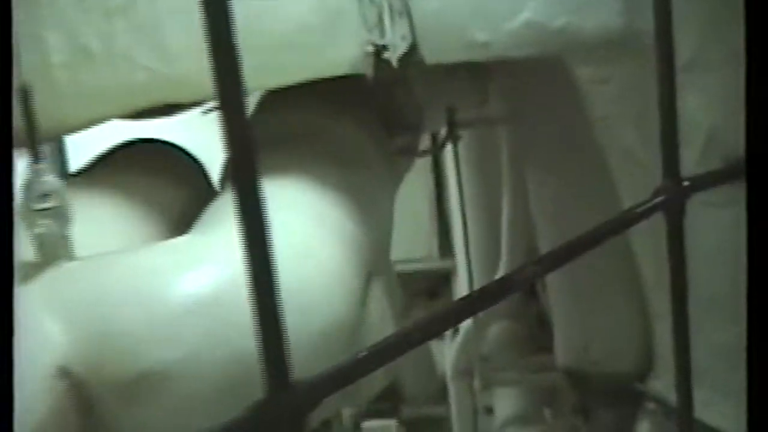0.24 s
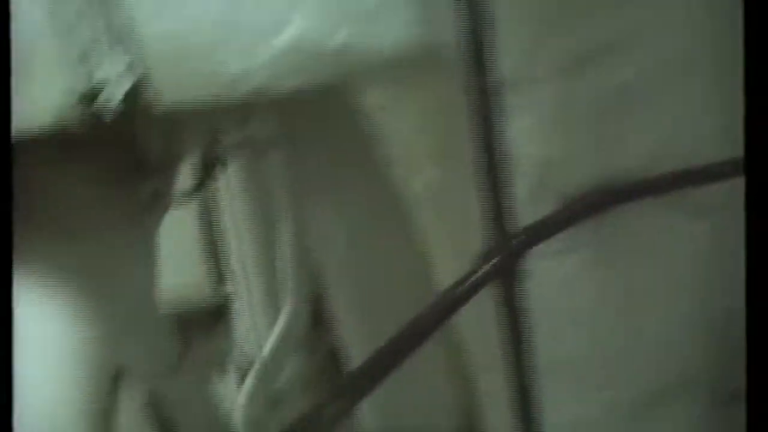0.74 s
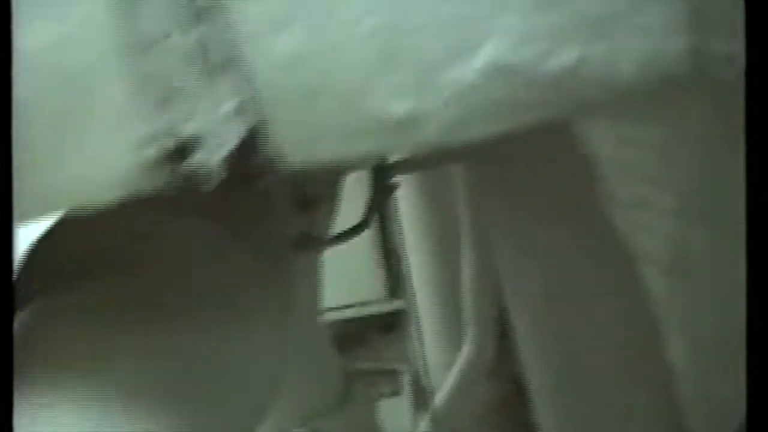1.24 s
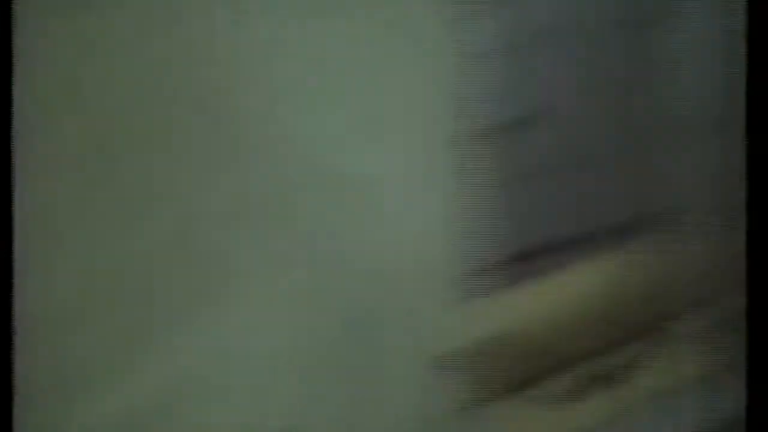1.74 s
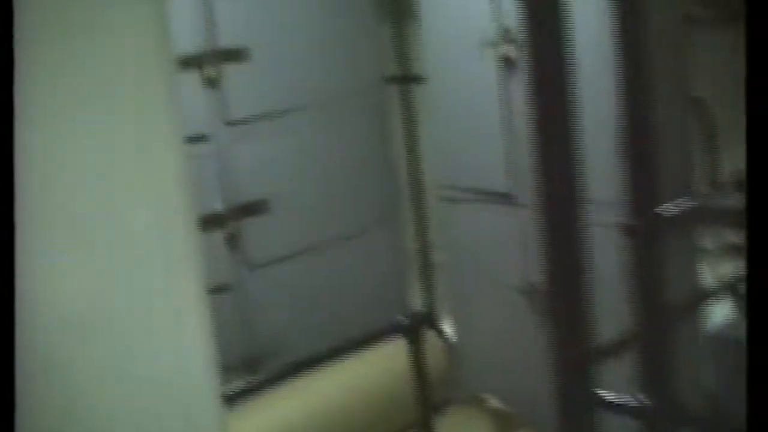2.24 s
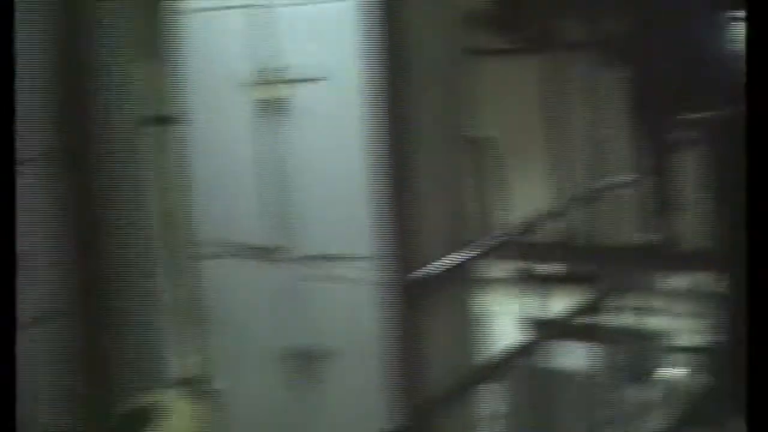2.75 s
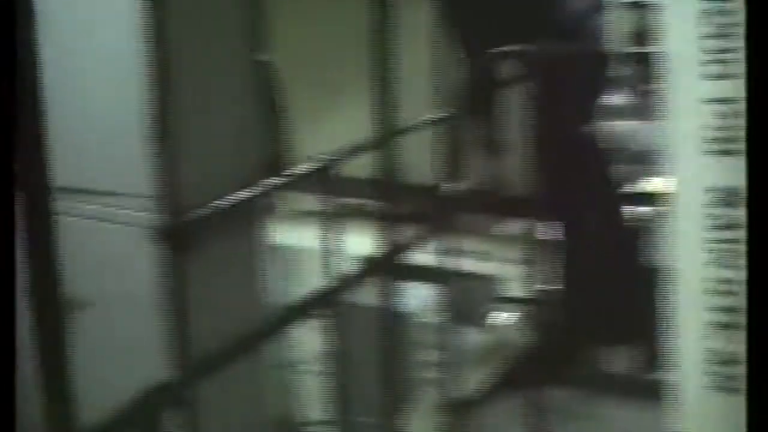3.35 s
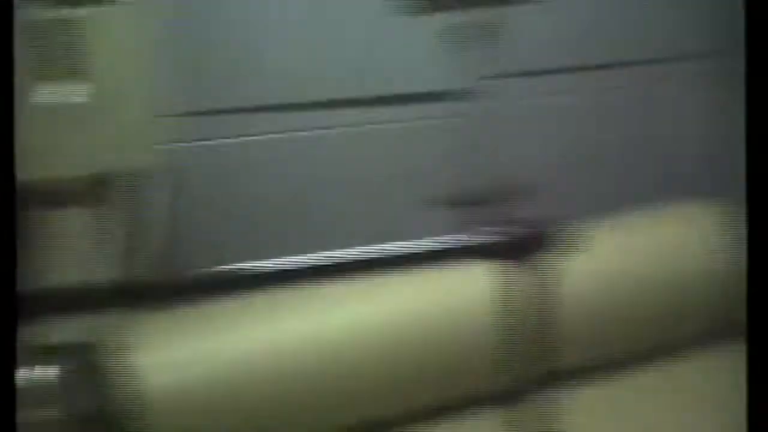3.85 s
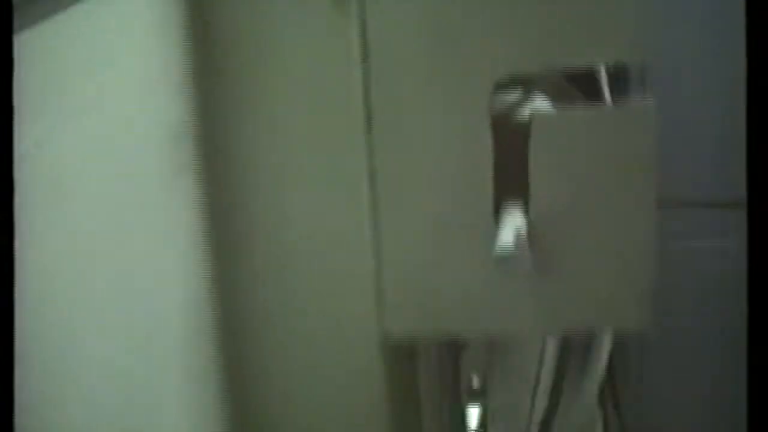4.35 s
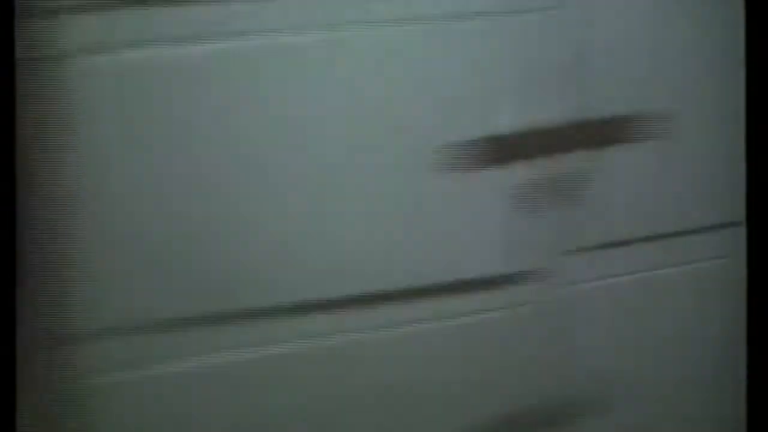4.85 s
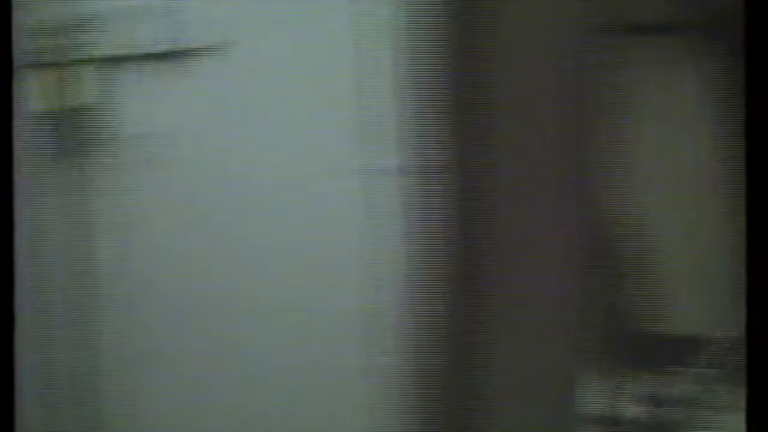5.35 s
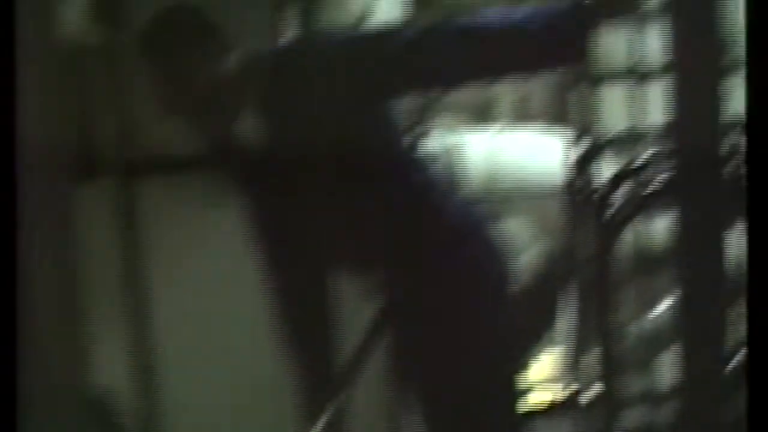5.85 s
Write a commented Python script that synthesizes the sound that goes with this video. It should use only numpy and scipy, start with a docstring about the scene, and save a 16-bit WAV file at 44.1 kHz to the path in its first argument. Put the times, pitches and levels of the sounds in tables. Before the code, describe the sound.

About six seconds of unbroken loud noise in a ship's steel machinery room. From the first instant, steam hisses brightly, blowers roar through resonant ducts and the deck rumbles low. A valve whistles near 3 kHz, raspy and wavering, swelling several times a second, with quick shrieks an octave higher and a thinner, fluttering side whistle. Roar is fullest at the start. Dull low bumps come around 0.7-0.8 s and 1.8 s, with fainter ones near 2.4, 3.0 and 3.8-3.9. The roar dips around 2 s; hissy resonances flare at 2.6-3.0, then roar and rumble thin markedly near 3.2. The whine ducks near 3.4; hiss and roar return by 3.9. A hollow mid flare comes at 4.7, a lower one at 5.3, and the whine drops briefly near 5.5 before a longer swell. It ends still running. Short dense echoes, compressed handheld camera sound, faint hum and line whistle, left-sided.

```python
"""A steam valve sings a wavering high whine with an octave shriek in a ship's steel machinery space.
Filtered noise makes the steam hiss, blower roar, deck rumble and brief resonant flares; sines make the tones.
Dense echoes make the tones beat, and soft noise pushes ring a few low modes as dull bumps.
A swinging hand-held tape camera shifts the balance, rides the gain and adds hum and line whistle;
the sound is on the left channel, with faint crosstalk on the right."""
import sys
import numpy as np
from scipy import signal
from scipy.fft import rfft, irfft
from scipy.io import wavfile
from scipy.ndimage import uniform_filter1d

SR = 44100
rng = np.random.default_rng(int(sys.argv[2]) if len(sys.argv) > 2 else 0)


def unload_wav(signal):
    """Save mono or channel-first audio to the path in sys.argv[1] as 16-bit WAV at rate SR, clipped to [-1, 1]."""
    wavfile.write(
        sys.argv[1],
        SR,
        np.round(np.clip(np.atleast_2d(signal).T, -1, 1) * 32767).astype(np.int16),
    )


N = 268425
T = np.arange(N) / SR
HZ = np.maximum(np.arange(N // 2 + 1) * SR / N, 1)
ROOM_T60_S = 0.32


def undb(db):
    """Decibels to gain."""
    return 10 ** (np.asarray(db) / 20)


def unit(x):
    """Scale to rms 1."""
    return x / np.sqrt(np.mean(x ** 2))


def curves(table):
    """Level columns of a time table, interpolated per sample."""
    time_s, *columns = np.transpose(table)
    return [np.interp(T, time_s, column) for column in columns]


def walk(corner_hz):
    """Low-passed random curve of rms 1."""
    spectrum = rfft(rng.standard_normal(N))
    return unit(irfft(spectrum / (1 + (HZ / corner_hz) ** 4), N))


def bell(center_s, reach_s):
    """Gaussian in time, 1 at the centre, exp(-2) at reach_s either side."""
    return np.exp(-2 * ((T - center_s) / reach_s) ** 2)


def resonance(hz, width_hz):
    """Complex response of one mode, gain 1 at its centre."""
    return 1 / (1 + 1j * (HZ / hz - hz / HZ) * hz / width_hz)


def patchy(x, depth_db, rate_hz=2.3, size=1024):
    """Narrow bands swell and fade separately as the microphone moves through room interference."""
    _, frame_s, bands = signal.stft(x, SR, nperseg=size)
    field = uniform_filter1d(rng.standard_normal(bands.shape), size=4, axis=0)
    rates_hz = np.arange(len(frame_s) // 2 + 1) / frame_s[-1]
    field = unit(irfft(rfft(field) / (1 + (rates_hz / rate_hz) ** 2), len(frame_s)))
    return signal.istft(bands * undb(depth_db * field), SR, nperseg=size)[1][:N]


def turbulence(spectrum, modes=(), patchy_db=1.2):
    """Flow noise with a broad colour, lifted in power where duct or pipe resonates."""
    hz, db = np.transpose(spectrum)
    colour = undb(np.interp(np.log(HZ), np.log(hz), db))
    lift = 1 + sum(np.abs(undb(mode_db) * resonance(mode_hz, width_hz)) ** 2
                   for mode_hz, width_hz, mode_db in modes)
    noise = irfft(rfft(rng.standard_normal(N)) * colour * np.sqrt(lift), N)
    return unit(patchy(noise, patchy_db))


def room(x):
    """Dense, exponentially decaying reflections from steel walls."""
    t = T[T < ROOM_T60_S]
    echoes = rng.standard_normal(len(t)) * np.exp(-np.log(1000) * t / ROOM_T60_S)
    return unit(irfft(rfft(x) * rfft(echoes, N), N))


def partial(phase, echo_db, steadiness):
    """Tone beating against its echoes; steadiness 1 levels the slow swell, keeps quick beats."""
    direct = np.sin(phase)
    tone = direct + undb(echo_db) * room(direct)
    swell_power = uniform_filter1d(tone ** 2, size=3000)
    return unit(tone / swell_power ** (steadiness / 2))


def swelling(events, rest_db, attack_s, release_s):
    """Level [dB] that rises from rest, holds and falls back at each event."""
    gain = rest = undb(rest_db)
    for start_s, length_s, db in events:
        rise = (T - start_s) / attack_s
        fall = (start_s + length_s - T) / release_s
        ramp = np.clip(np.minimum(rise, fall) + .5, 0, 1)
        gain = gain + (undb(db) - rest) * np.sin(np.pi / 2 * ramp) ** 2
    return 20 * np.log10(np.maximum(gain, rest / 2))


# whine swells: (start [s], length [s], level before trim [dB])
WHINE_SWELLS = [(.13, .2, -31), (.52, 0.098, -25), (1.0, .13, -25), (1.425, 0.089, -23),
                (1.643, 0.1474, -24.5), (1.83, 0.099, -23), (2.15, 0.067, -27), (2.5, 0.138, -25),
                (2.74, 0.055, -28.5), (2.86, 0.113, -23.5), (3.0, 0.117, -25), (3.14, 0.1624, -22),
                (3.635, 0.055, -26.5), (3.77, 0.064, -28), (3.94, 0.068, -26), (4.07, 0.0887, -25),
                (4.36, .1, -26), (4.47, 0.145, -21.5), (4.695, .04, -28), (4.775, 0.043, -25),
                (4.84, 0.0844, -23.5), (5.01, 0.051, -26.5), (5.14, 0.039, -26), (5.23, 0.18, -25),
                (5.68, 0.34, -24.5)]
# octave shrieks: (start [s], length [s], level before trim [dB])
OCTAVE_SHRIEKS = [(0.205, 0.045, -20), (0.363, 0.078, -23), (0.653, 0.03, -21.5), (0.818, 0.097, -20.5),
                  (0.93, 0.028, -23), (1.058, 0.041, -18), (1.179, 0.043, -18.5), (1.317, 0.044, -20.5),
                  (1.437, 0.064, -22.5), (1.788, 0.052, -22.5), (1.907, 0.13, -19.5), (2.194, 0.064, -20),
                  (2.288, 0.04, -24.5), (2.37, 0.066, -21.5), (2.464, 0.076, -22), (2.685, 0.06, -22),
                  (2.895, 0.073, -23.5), (3.065, 0.034, -23), (3.125, 0.16, -21), (3.325, 0.046, -22.5),
                  (3.494, 0.033, -20.5), (4.009, 0.04, -23), (4.105, 0.065, -19), (4.288, 0.019, -21.5),
                  (4.703, 0.03, -23), (4.975, 0.037, -21.5), (5.127, 0.025, -21.5)]
# whine dropouts: (deepest time [s], reach either side [s])
WHINE_DROPOUTS = [(0.066, 0.079), (0.795, .05), (1.164, 0.036), (2.072, 0.039), (2.274, .04), (3.387, .12),
                  (3.885, .06), (4.04, 0.028), (4.264, 0.059), (4.675, 0.019), (4.753, .015),
                  (4.827, 0.014), (5.468, 0.1125)]
WHINE_HZ, SAG_HZ_PER_S, FLATTEN_HZ_PER_DB = 3039, 2.4, 1.0
WHINE_ATTACK_S, WHINE_RELEASE_S = 0.051, 0.054
OCTAVE_ATTACK_S, OCTAVE_RELEASE_S = 0.02, 0.031
# resting levels before trim
WHINE_DB, OCTAVE_DB, OCTAVE_FADE_DB_PER_S = -31.5, -28, 0.28
DROPOUT_DB = -9


def valve(first_trim_db=0.83, octave_trim_db=1.0, third_db=-47):
    """Steam past a valve edge whistles; flow flutters pitch and level, the whine flattens as it swells."""
    whine_rest_db = WHINE_DB + 2 * walk(12)
    octave_rest_db = OCTAVE_DB - OCTAVE_FADE_DB_PER_S * T + 3.0 * walk(30)
    whine_db = swelling(WHINE_SWELLS, whine_rest_db, WHINE_ATTACK_S, WHINE_RELEASE_S)
    whine_db = whine_db + DROPOUT_DB * sum(bell(s, reach_s) for s, reach_s in WHINE_DROPOUTS)
    octave_db = swelling(OCTAVE_SHRIEKS, octave_rest_db, OCTAVE_ATTACK_S, OCTAVE_RELEASE_S)

    flatten_hz = FLATTEN_HZ_PER_DB * (whine_db - WHINE_DB)
    hz = WHINE_HZ - SAG_HZ_PER_S * T - flatten_hz + 15 * walk(16)
    rasp = walk(250)
    low_phase = 2 * np.pi * np.cumsum(hz + 16 * rasp) / SR
    high_hz = 2 * hz - 22 + 20 * walk(35) + 22 * rasp
    high_phase = 2 * np.pi * np.cumsum(high_hz) / SR

    first_gain = undb(whine_db + first_trim_db + .6 * walk(14))
    octave_gain = undb(octave_db + octave_trim_db + .5 * walk(40))
    third_gain = undb(third_db + 2.5 * walk(5.7))
    first = first_gain * partial(low_phase, echo_db=-12, steadiness=1)
    octave = octave_gain * partial(high_phase, echo_db=-12, steadiness=1)
    third = third_gain * partial(3 * low_phase, echo_db=12, steadiness=.3)
    return first + octave + third


def side_whistle(pipe_db, hz=4395, waver_hz=40, below_db=-14, fade_db=4.0):
    """A pipe mode on the edge of whistling wavers in pitch and level."""
    phase = 2 * np.pi * np.cumsum(hz + waver_hz * walk(30.7)) / SR
    gain = undb(pipe_db + below_db + fade_db * walk(9.5))
    return gain * partial(phase, echo_db=-8, steadiness=0.46)


# pipe noise colour: (frequency [Hz], relative density [dB per Hz])
PIPE_SPECTRUM = [(2500, -23), (3600, -12), (4100, -8.5), (4500, 0), (4720, -8.5), (5050, -9), (5250, 0),
                 (5750, 0), (5950, 4), (6350, -5), (6620, -10.5), (8000, -36)]
# pipe cross modes: (frequency [Hz], width [Hz], level over broad noise [dB])
PIPE_CROSS_MODES = [(3903, 40, 6.5), (4170, 51, 7.5), (4370, 90, 1.5), (4800, 40, 7), (5152, 50, 2),
                    (5000, 60, 1), (5620, 73, 2), (6900, 156, 10)]
# throttle hiss colour: (frequency [Hz], relative density [dB per Hz])
JET_SPECTRUM = [(5000, -15), (6900, -4.5), (7800, -0.5), (8450, 1), (8800, -1), (9250, 5.5), (10000, 0.5),
                (11000, -2.5), (11700, -14), (12700, -18.5), (14300, -56), (15500, -42)]


def steam(pipe_db, jet_db, pipe_trim_db=1.12, jet_trim_db=0.66, flicker_db=0.8):
    """Steam rings the pipe's cross modes and hisses at the throttle; both flicker with the flow."""
    pipe_gain = undb(pipe_db + pipe_trim_db + flicker_db * walk(11))
    jet_gain = undb(jet_db + jet_trim_db + flicker_db * walk(14.4))
    pipe = turbulence(PIPE_SPECTRUM, PIPE_CROSS_MODES, patchy_db=2.46) * pipe_gain
    jet = turbulence(JET_SPECTRUM, patchy_db=1.84) * jet_gain
    return pipe + jet


# duct noise colour: (frequency [Hz], relative density [dB per Hz])
ROAR_SPECTRUM = [(100, -45), (280, -15.5), (370, -8), (620, -6), (880, 0.5), (1200, -3), (1450, -2),
                 (1620, -6), (2000, -5), (2450, -7.5), (3200, -4.5), (5000, -12), (8000, -52.5)]
# duct resonances: (frequency [Hz], width [Hz], level over broad noise [dB])
DUCT_RESONANCES = [(340.6, 35, 6), (429, 23, 1.5), (534, 45, 5), (682, 13, 2.5), (2740, 60, -8)]
# rotor tones: (mean frequency [Hz], mean level [dB])
ROTOR_TONES = [(175, -58), (350, -55), (699.5, -53)]


def blowers(roar_db, trim_db=2.0, surge_db=0.33, drift=0.0032):
    """Air roars in resonant ducts; rotor tones drift together in pitch and fade separately."""
    roar_gain = undb(roar_db + trim_db + surge_db * walk(15.0))
    sound = turbulence(ROAR_SPECTRUM, DUCT_RESONANCES) * roar_gain
    phase_per_hz = 2 * np.pi * np.cumsum(1 + drift * walk(3.6)) / SR
    for hz, db in ROTOR_TONES:
        sound = sound + undb(db + 1.7 * walk(0.41)) * unit(np.sin(hz * phase_per_hz))
    return sound


# plating noise colour: (frequency [Hz], relative density [dB per Hz])
DECK_SPECTRUM = [(20, -23), (50, -22), (75, -11), (100, -10), (140, 0), (185, 2.5), (215, -1), (245, 4.5),
                 (300, 0), (600, -25.5)]
# deck rumble before trim: (time [s], level [dB])
DECK_LEVELS = [(0.0, -48.5), (0.96, -46), (3.12, -55.5), (3.19, -58), (3.44, -53.5), (6.05, -52),
               (6.09, -51)]


def deck(trim_db=3):
    """Plating rumbles under the machines as low filtered noise."""
    return turbulence(DECK_SPECTRUM) * undb(curves(DECK_LEVELS)[0] + trim_db)


# brief resonances: (top time [s], reach either side [s], frequency [Hz],
# width before squaring the response [Hz], level [dB])
RESONANT_FLARES = [(0.059, 0.24, 172, 25, -41), (0.08, 0.18, 4360, 50, -27), (1.4, 0.079, 3230, 60, -35),
                   (2.606, 0.21, 5350, 260, -27.5), (2.851, 0.2, 5570, 320, -24.5),
                   (2.86, .05, 4815, 40, -33), (3.037, 0.079, 4360, 30.1, -31),
                   (3.038, 0.074, 9080, 120, -33), (4.66, 0.082, 1090, 160, -30),
                   (5.34, 0.16, 820, 70, -33.5)]


def flares():
    """Flow briefly drives one resonance harder, so narrow-band noise sings out."""
    out = np.zeros(N)
    for top_s, reach_s, hz, width_hz, db in RESONANT_FLARES:
        ring = unit(irfft(rfft(rng.standard_normal(N)) * resonance(hz, width_hz) ** 2, N))
        out += undb(db) * ring * bell(top_s, reach_s)
    return out


# dull bumps: (push-envelope peak time [s], peak level [dB])
BUMP_EVENTS = [(0.733, -28), (0.824, -34.5), (1.755, -32.5), (1.839, -33), (2.449, -38), (2.987, -37),
               (3.082, -38), (3.779, -41), (3.914, -41)]
# modes a bump rings: (frequency [Hz], width [Hz], relative level before body response [dB])
BUMP_RING_MODES = [(117, 16, -12), (132, 23, 12), (148, 20, 3), (178, 22, -5)]


def bumps(contact_s=0.01275):
    """Soft, scuffing noise pushes ring a few low modes."""
    t, out = T[:SR // 2], np.zeros(N)
    modes = sum(undb(db) * resonance(hz, width_hz) for hz, width_hz, db in BUMP_RING_MODES)
    body = resonance(143, 90)
    ring = irfft(modes * body, N)[:len(t)]
    for peak_s, db in BUMP_EVENTS:
        push = rng.standard_normal(len(t)) * t * np.exp(-t / contact_s)
        thud = signal.fftconvolve(push, ring)[:len(t)]
        thud = thud / np.abs(thud).max() * undb(db)
        start = int((peak_s - contact_s) * SR)
        out[start:start + len(t)] += thud[:N - start]
    return out


# balance as the microphone turns, before source trims:
# (time [s], blower roar level [dB], pipe steam level [dB], jet hiss level [dB])
FACING_LEVELS = [(0.0, -26, -24.5, -30.5), (0.34, -28.5, -24.5, -31.5), (1.37, -30.5, -26.5, -31.5),
                 (1.49, -32, -25.5, -30.5), (1.75, -29.5, -24, -29.5), (1.98, -36, -26.5, -34),
                 (2.24, -31, -25.5, -31), (3.0, -34.5, -26, -29.5), (3.2, -38, -27.5, -31),
                 (3.49, -35.5, -29.5, -30), (3.88, -31.5, -25.5, -28), (4.46, -30, -26.5, -29),
                 (4.53, -30, -26.5, -30), (4.66, -28.5, -24.5, -28.5), (4.78, -30, -25, -30.5),
                 (5.39, -29.5, -26, -29.5), (5.49, -29.5, -24.5, -28.5), (6.09, -30, -25.5, -30.5)]


def scene():
    """All the machinery at one microphone, on two equal channels."""
    roar_db, pipe_db, jet_db = curves(FACING_LEVELS)
    sound = valve() + side_whistle(pipe_db) + steam(pipe_db, jet_db)
    sound = sound + blowers(roar_db) + deck() + flares() + bumps()
    return np.array([sound, sound])


def gain_control(x, knee_db=-19, slope=0.48, follow_s=0.034, makeup_db=-0.08):
    """Turn everything down as smoothed power passes the knee."""
    keep = np.exp(-1 / (follow_s * SR))
    power = signal.lfilter([1 - keep], [1, -keep], x ** 2)
    level_db = 10 * np.log10(power + 1e-12)
    return x * undb(makeup_db - slope * np.maximum(level_db - knee_db, 0))


# camera hum and line whistle: (frequency [Hz], level before output gain [dB])
CAMERA_HUM_TONES = [(36, -66), (60, -60.5), (84, -61.5), (15734, -60.5)]
TOP_HZ = 15900


def record(dry, leak_db=-59):
    """Camera gain control, peak rounding, hum, right-channel crosstalk and steep low-pass."""
    sound = gain_control(dry)
    sound = sound / (1 + (sound / .42) ** 8) ** (1 / 8)
    hum = sum(undb(db) * unit(np.sin(2 * np.pi * hz * T)) for hz, db in CAMERA_HUM_TONES)
    channel_gains = np.array([[1], [undb(leak_db)]])
    tracks = 2 * (sound + hum) * channel_gains
    low_pass = signal.ellip(10, .1, 80, TOP_HZ, fs=SR, output="sos")
    return signal.sosfilt(low_pass, tracks)


dry = scene()
out = record(dry)
unload_wav(out)
```